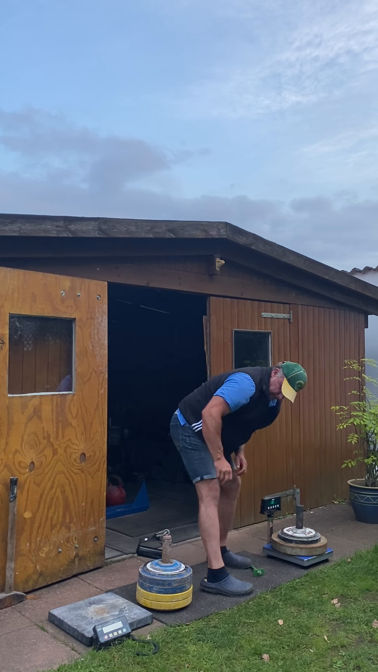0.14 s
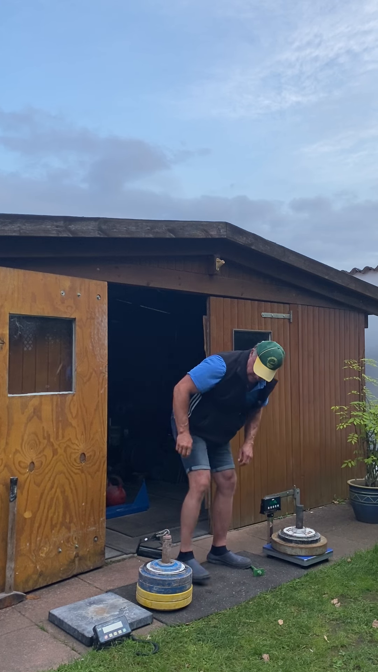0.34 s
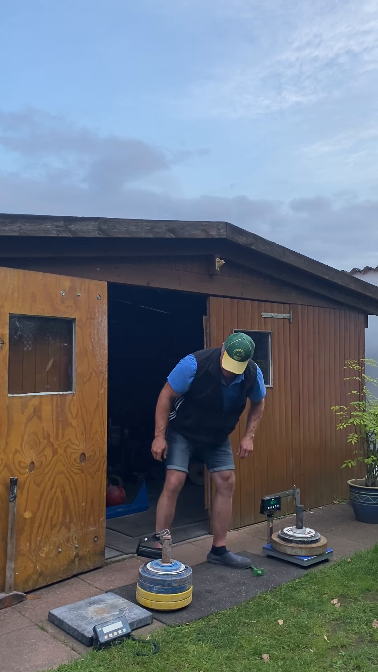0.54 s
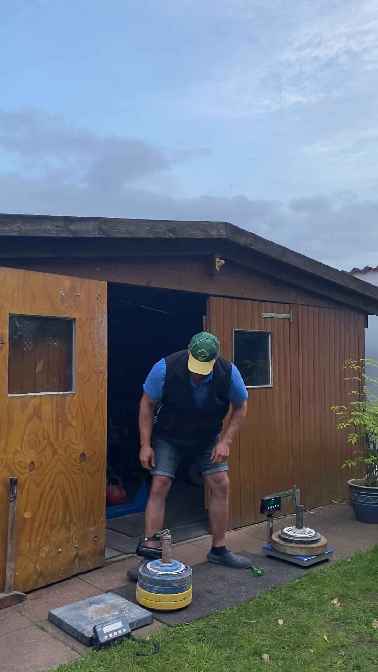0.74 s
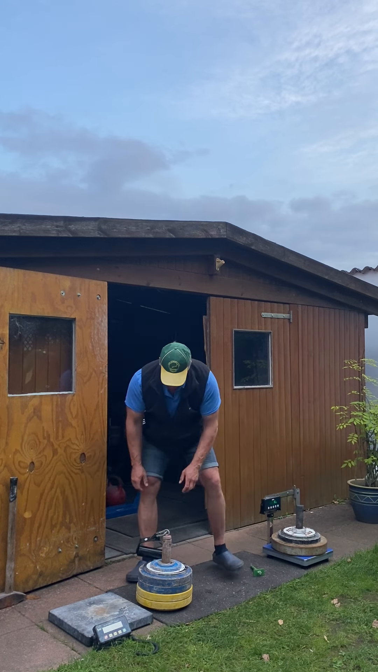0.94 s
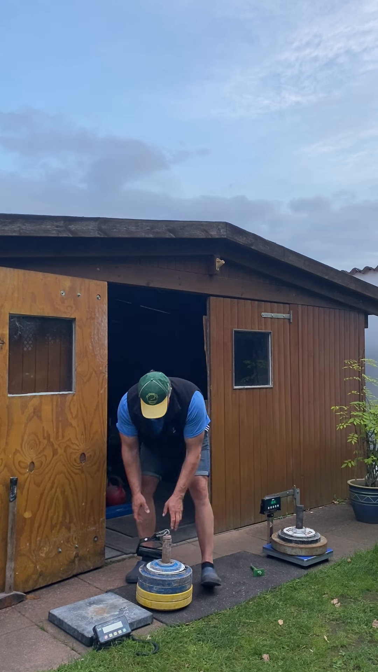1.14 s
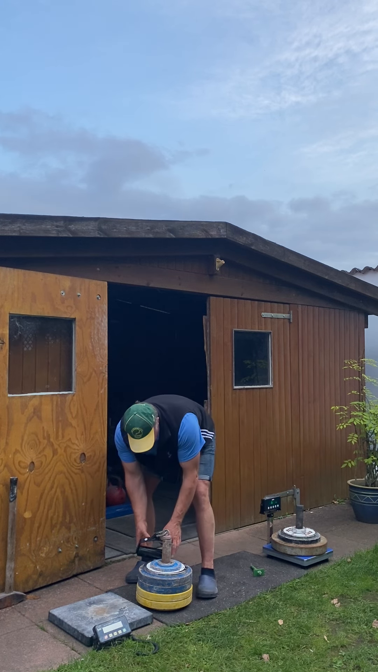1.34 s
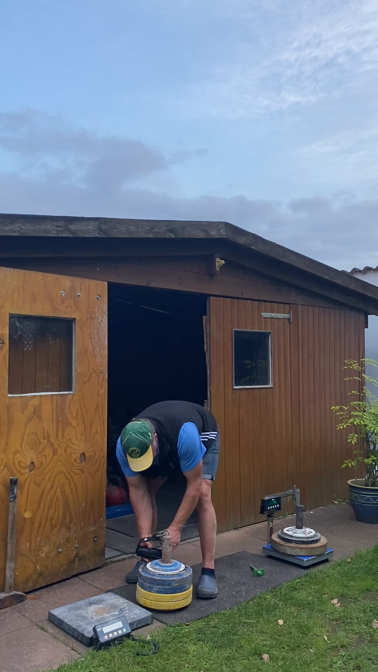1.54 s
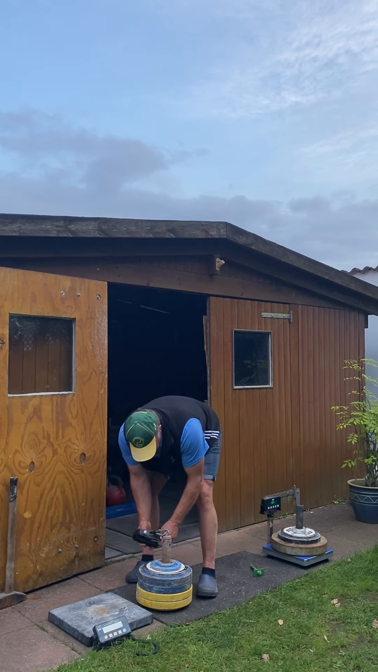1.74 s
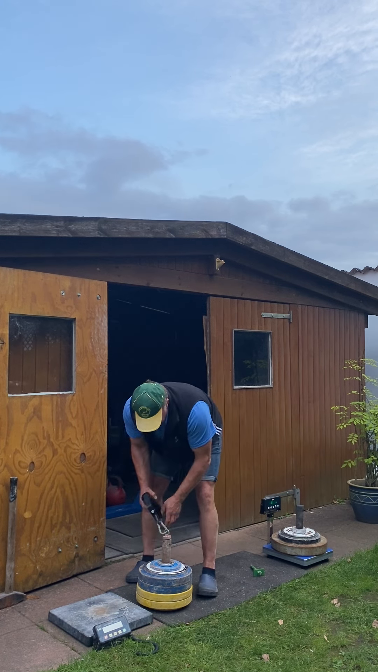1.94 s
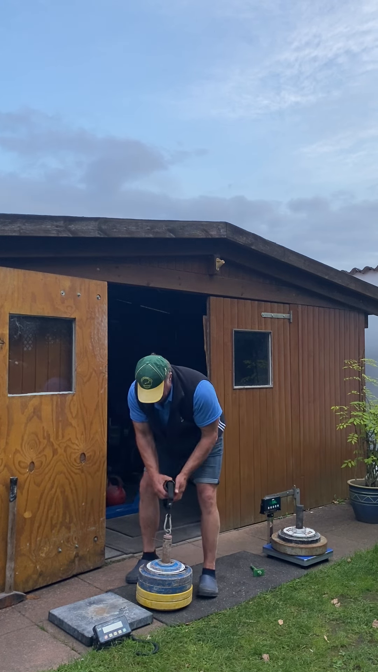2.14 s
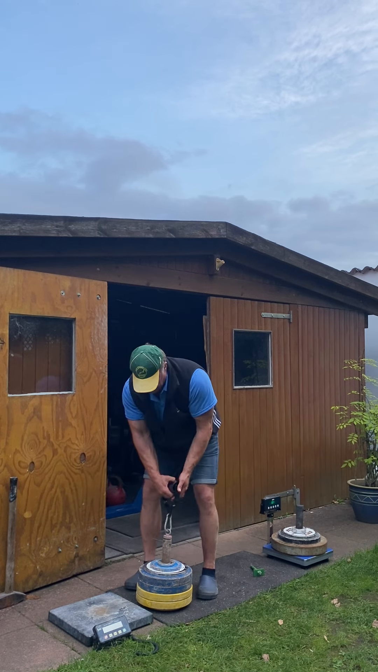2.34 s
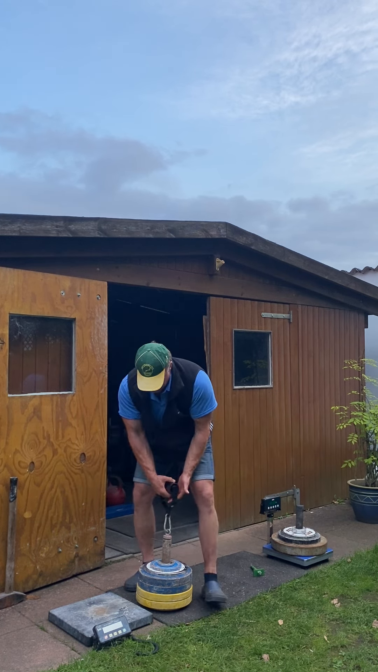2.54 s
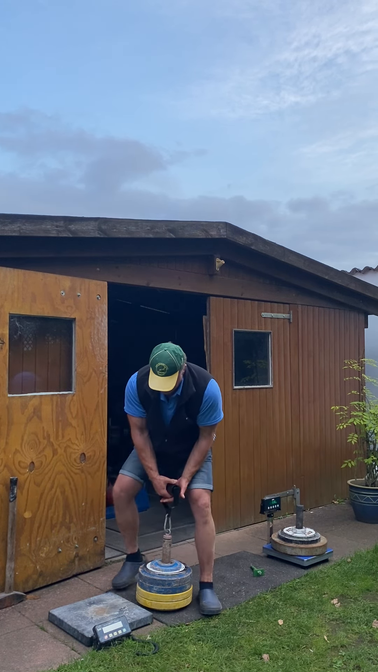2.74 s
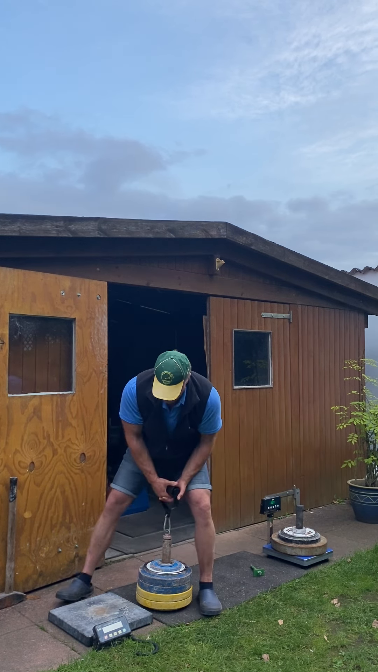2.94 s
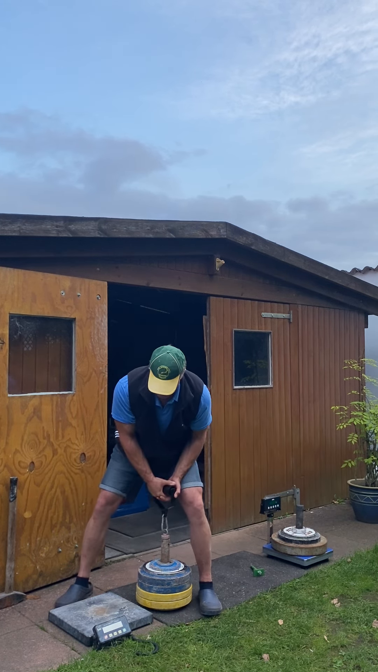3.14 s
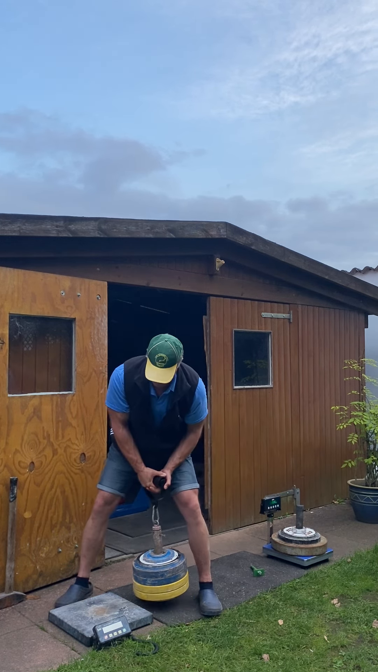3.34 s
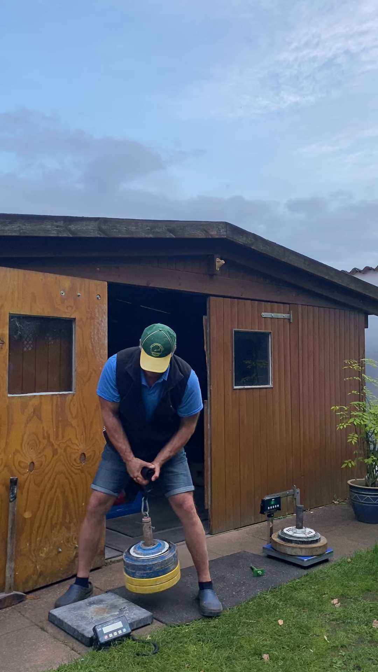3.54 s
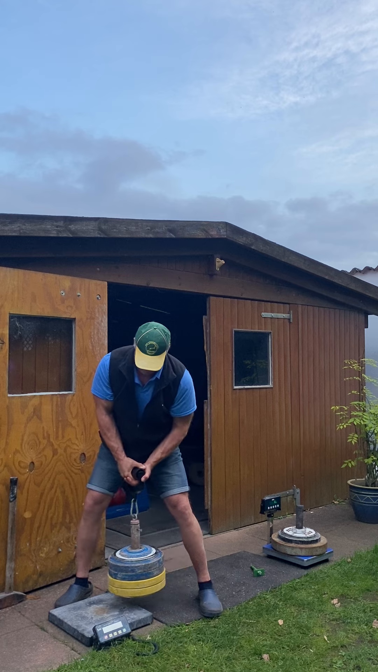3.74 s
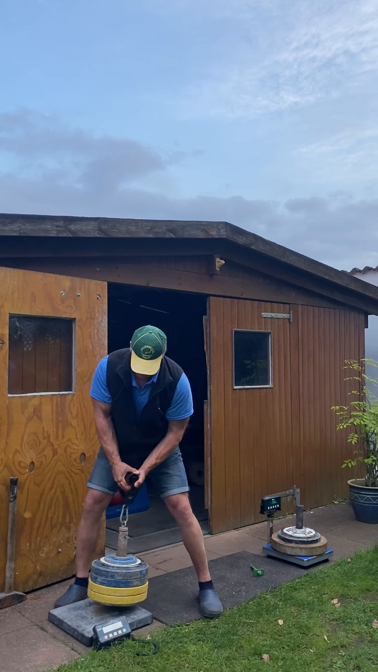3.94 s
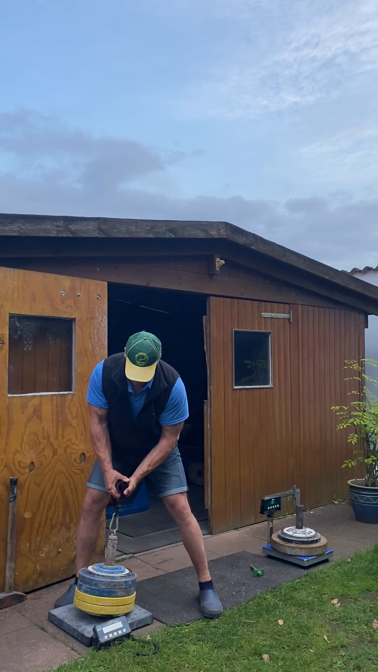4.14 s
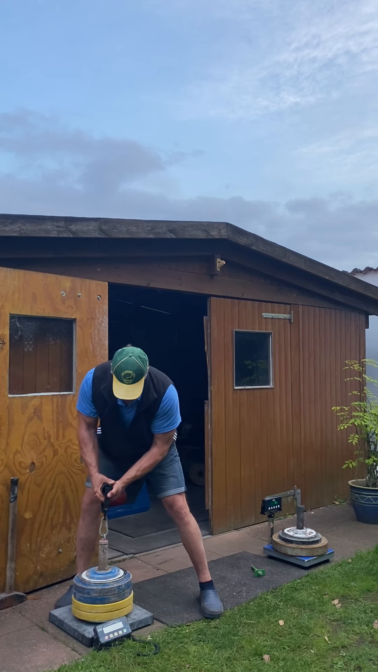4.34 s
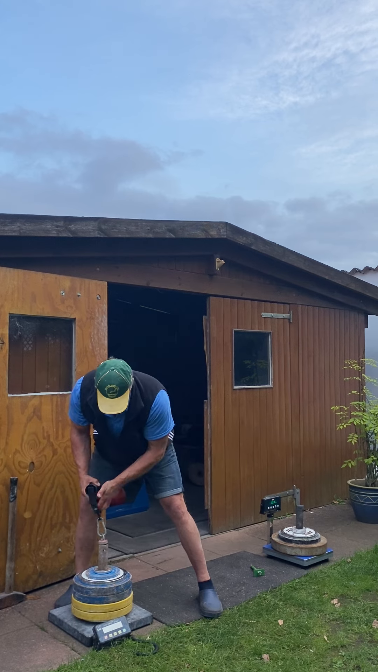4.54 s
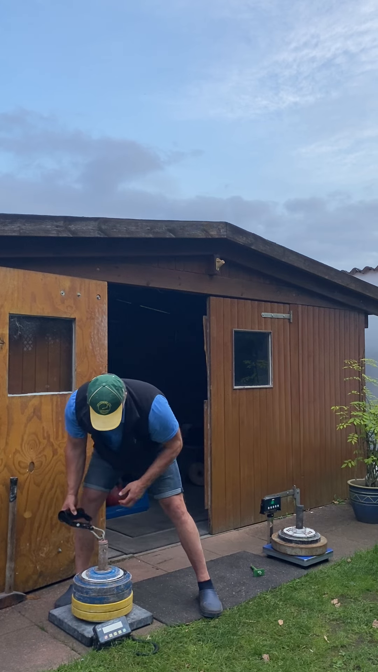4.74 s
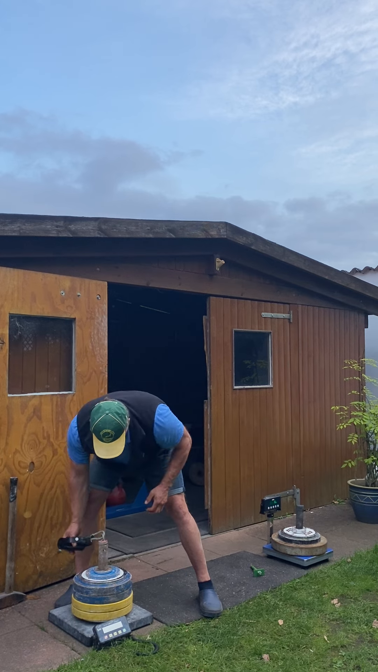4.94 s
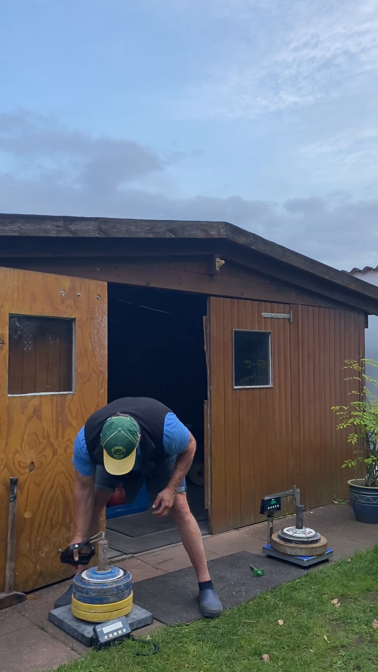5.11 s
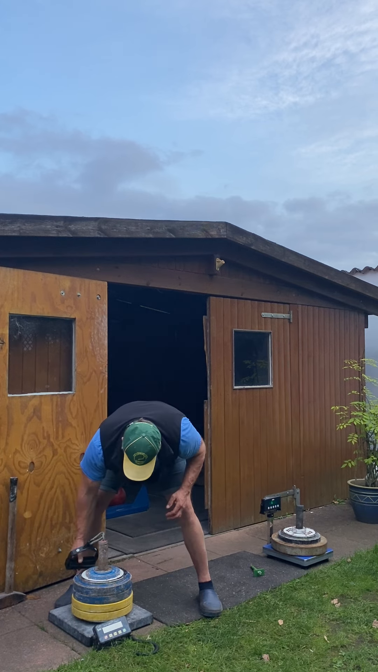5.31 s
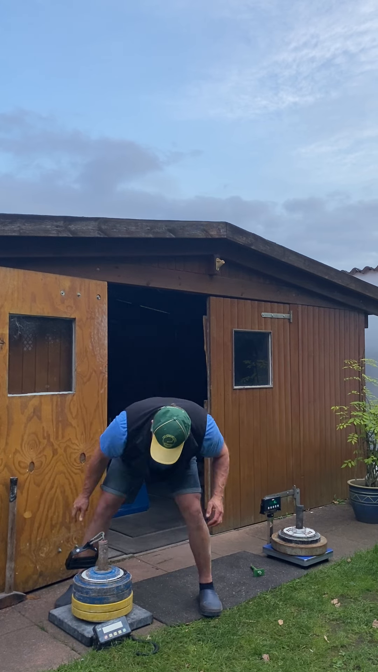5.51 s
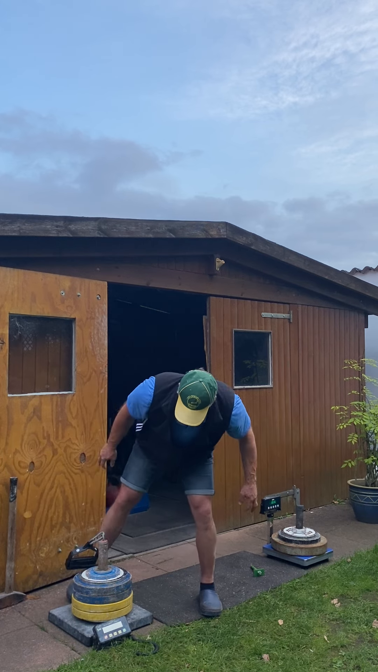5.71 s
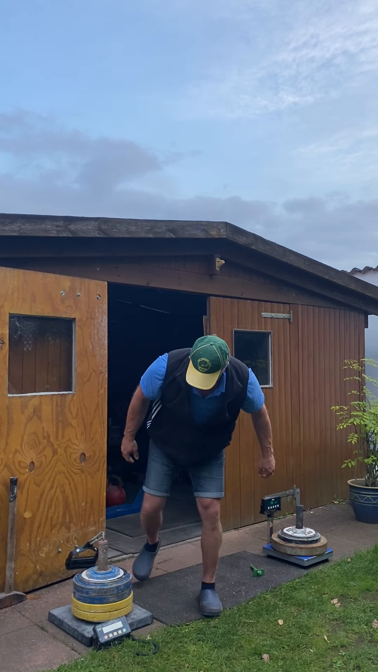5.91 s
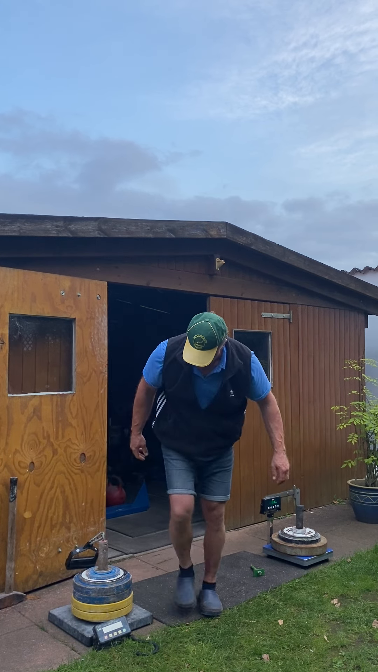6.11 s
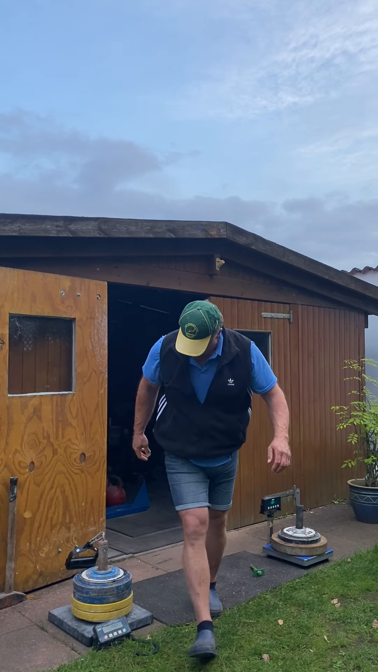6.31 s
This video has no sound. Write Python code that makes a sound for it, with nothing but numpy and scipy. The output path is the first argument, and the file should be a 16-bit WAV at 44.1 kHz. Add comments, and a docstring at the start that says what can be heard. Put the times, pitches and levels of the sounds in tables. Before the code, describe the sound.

Low, soft outdoor air, nearly still at first. Small metal clicks and dull knocks gather as a handle is gripped, with a clear high whistle-like peep and soft footfalls. After a lull with light knocks, heavy plates hit a platform scale twice in quick succession, loud and low with ringing clatter, sliding scrape and another peep. The dropped handle clanks sharply, then one scuff and quiet. Phone stereo, short yard echo.

```python
"""A stack of weight plates lands on a platform scale in two heavy blows: low modes boom, plates ring and rattle.
Before that a hook on a steel handle clinks (gritty contact noise plus damped modes) as it lifts the stack; it
drags now and then before the landing and just before the handle drops against the stack with a clang.
Shoes scuff, tap and bump (shaped noise), thin peeps whistle (gliding sines), and hush is slowly drifting noise.
Place: a yard before a wooden shed, with echo from decaying noise; microphone: the two ports of a phone."""
import sys
import numpy as np
from scipy import signal
from scipy.fft import rfft, irfft, next_fast_len
from scipy.io import wavfile
from scipy.ndimage import uniform_filter1d

SR = 44100
rng = np.random.default_rng(int(sys.argv[2]) if len(sys.argv) > 2 else 0)


def wav_out(sig):
    """Save sig, one row per channel (or a flat mono array), as 16-bit PCM at SR to the path in sys.argv[1]."""
    wavfile.write(sys.argv[1], SR, np.round(np.clip(np.atleast_2d(sig).T, -1, 1) * 32767).astype(np.int16))


N = 280917
TIME = np.arange(N) / SR  # s, whole scene
AGE = np.arange(SR) / SR  # s, since one event began

# Event levels are relative, before echo and ports; mode t60 is before any damping by contact.
# the stack hitting or jolting the scale platform: start_s, level_db
THUDS = [(4.1837, -12), (4.212, -21), (4.2881, -6.5), (4.312, -27.5), (4.35, -19), (4.372, -22.5),
         (4.48, -39), (4.523, -44.5), (4.672, -40), (4.732, -49), (5.198, -29), (5.232, -40)]
# modes of the platform: pitch_hz, level_db, t60_s
SCALE_MODES = [(49, -26.5, 0.3), (164, -12, 0.16), (211.4, -7.5, 0.17), (274.8, 3.5, 0.051),
               (319, 7, 0.029), (369, 0.5, 0.055), (261.3, -16.5, 0.3), (459, -16.5, 0.19)]
# plate striking plate: start_s, level_db, bass_db, treble_db, chatter_s, strongest_hz
CLASHES = [(4.18, -13, 5.5, -2, .014, 716.6), (4.22, -18, -10.5, 5.5, .018, 2046),
           (4.2255, -20, -5.5, 15, .007, 719), (4.237, -26, -8, -2.5, .007, 1154),
           (4.265, -25, -5.5, 1, .006, 760), (4.2855, -11.5, -4, -28, .005, 810),
           (4.303, -13.5, -1.5, 9, .009, 1050), (4.339, -21, -5, 1, .009, 900),
           (4.355, -20.5, -5, 3.5, .007, 1191), (4.372, -35.5, -5.5, 10.5, .012, 1250),
           (4.412, -29.5, -2.5, 4.5, .01, 783.5), (4.455, -34.5, -7.5, 0, .006, 1444),
           (4.476, -35, -8, 0, .006, 2800), (4.507, -29.5, -9.5, -8.5, .004, 1748),
           (4.54, -35.5, -11.5, -6.5, .006, 2300), (4.572, -39.5, -10, -11, .005, 1250),
           (4.619, -41.5, -9.5, -8.5, .006, 1300), (4.685, -38, -0.5, -21, .006, 1030),
           (4.73, -42.5, -0.5, -15.5, .009, 1030), (4.788, -46, 0.5, -15, .012, 1263),
           (4.878, -52, 1, -15.5, .006, 940), (5.042, -49, -6.5, -4, .012, 1200),
           (5.06, -52, -5.5, -2, .007, 1250)]
# colour of plate contact: pitch_hz, level_db
PLATE_COLOUR = [(40, -13), (120, -15), (250, -1), (500, -0.5), (750, 8.5), (1300, 0), (2100, -6.5),
                (3000, -7.5), (4600, -16.5), (5700, -7.5), (8000, -27), (11000, -12), (12500, -10.5)]
# modes of the plates: pitch_hz, level_db, t60_s
PLATE_MODES = [(671, 0, .16), (721, 0, .14), (778, -3, .16), (812, 1, .18), (865, -3, .18), (957, -4, .16),
               (1028, -6, .25), (1128, -5, .2), (1262, -4, .27), (1384, -6, .2), (1575, -6, .2),
               (1712, -7, .22), (1940, -12, .14), (2112, -13, .13), (2299, -14, .13), (2778, -18, .12)]
CLASH_RING_DB = -7
# jolts that set the plates rocking: start_s, body_level_db, treble_level_db, hold_s
ROCKINGS = [(4.181, -25, -27, 0.085), (4.286, -27.5, -29, 0.1)]
ROCK_ATTACK_S, ROCK_T60_S, ROCK_TREBLE_T60_S = 0.0089, 0.21, 0.44
SETTLE_DB, SETTLE_T60_S = -21, 2.1  # a faint wobble outlasts the rocking
ROCK_CLICKS_PER_S, ROCK_CLICK_DB = 160, -8.5  # hard edge contacts amid the grit of the rocking
# plate sliding on plate as the stack twists: start_s, level_db, hold_s
SLIDES = [(4.366, -37, .09), (4.483, -41.5, .025), (4.59, -56, .04)]
# resonances of the sliding plates: pitch_hz, level_db, t60_s
GRIND_MODES = [(853, -5, .07), (1028, -4, 0.11), (1290, -2.5, .14), (1440, -7, 0.07), (1600, -2.5, .1),
               (1665, -1, 0.14), (1735, -0.5, .12), (2130, -8.5, .05), (2280, -9, .08), (2430, -8, .07),
               (2790, -10, .06), (3060, -14, .07), (3550, -16, .06), (3850, -14, .09), (5500, -16, .04)]
SLIDE_ATTACK_S, SLIDE_T60_S = 0.015, 0.71
CATCHES_PER_S, SLIP_DB, GRIND_SWAY_DB = 130, -8, 3.5
# the platform shuddering under the settling stack: pitch_hz, level_db, t60_s
SHUDDER_MODES = [(283, -1, .1), (335, -2, .07), (425, -2, .07)]
SHUDDER_S, SHUDDER_DB, SHUDDER_HOLD_S = 4.62, -52, 0.29

# the handle falling against the stack: start_s, level_db, bass_db, treble_db, chatter_s, strongest_hz
CLANGS = [(5.173, -36, 0.5, 1.5, 0.037, 7200), (5.191, -14.5, -6.5, 1.5, 0.0027, 1250),
          (5.196, -10, -1, 1.5, 0.003, 5840), (5.2029, -20.5, 0, -2, .006, 5800)]
# colour of handle contact: pitch_hz, level_db
HANDLE_COLOUR = [(60, -22.5), (150, -7), (260, 6.5), (400, -1), (600, -3.5), (1200, 3), (1700, 1),
                 (2500, -7.5), (4000, -1), (4950, -17), (5600, -5.5), (6700, -5), (9000, -5), (10600, 7.5),
                 (11400, -21)]
# modes of the handle: pitch_hz, level_db, t60_s
HANDLE_MODES = [(1085, -10, .055), (1188, -5.5, .04), (1255, -8, .04), (1440, -7, .055), (2050, -13, .07),
                (2390, -13, .11), (3397, -21, .13), (2700, -15, .11), (1685, -17, .2), (2982, -18, .33),
                (3763, -20, .12), (5412, -8, .27), (5522, 4, .08), (5620, -2, .04), (5730, -4, .04),
                (5820, -6, .04), (5918, -15, .24), (6368, -19, .33), (7100, -10, .08), (7180, -10, .3),
                (7312, -7, .14), (7540, -14, .26), (8258, -14, .16), (9625, -12, .11), (10045, -7, .18),
                (10845, 0, .1)]
CLANG_RING_DB = -5.5

# the hook clicking against the handle and the eye of the pin: start_s, level_db, treble_db, strongest_hz
CLINKS = [(1.549, -59.5, -6.5, 1793), (1.655, -46, 7.5, 1890), (1.799, -52.5, -6, 3630),
          (1.917, -37.5, 8.5, 1901), (2.0615, -48, 12.5, 2390), (3.722, -66.5, -15, 1900),
          (3.997, -59, -9, 1900), (4.82, -51.5, -11, 2150), (4.899, -48, -5.5, 2100), (5.14, -51, 6, 1400),
          (5.542, -57.5, -0.5, 5600)]
CLINK_BASS_DB, CLINK_CHATTER_S, CLINK_RING_DB = -4, 0.0024, -6.5
# the pin knocking in the plates as it is tugged and swings: start_s, level_db, chatter_s, strongest_hz
KNOCKS = [(1.765, -55, 0.0057, 1316), (1.83, -46.5, 0.003, 795), (1.906, -51, .006, 1000),
          (1.939, -44, 0.0074, 1342), (1.965, -50.5, 0.018, 805), (2.118, -45, 0.013, 1014),
          (2.63, -50.5, 0.0082, 890), (3.252, -57, 0.0037, 980), (3.578, -47, 0.0065, 998),
          (3.595, -49, 0.0033, 1752), (3.619, -46.5, 0.0062, 1100), (3.856, -43.5, .006, 800),
          (3.92, -44.5, 0.013, 997), (4.085, -47, 0.0056, 1334), (4.123, -45, 0.0065, 790.5)]
KNOCK_TREBLE_DB, KNOCK_RING_DB = -15, -3.5
# once the pin bears the weight (s), its knocks carry more bass (dB)
LOADED_S, SLACK_BASS_DB, LOADED_BASS_DB = 3.3, -1.5, 11
# the loaded hook ticks while the stack hangs; jitter and level spread are standard deviations
HANGING_S, TICK_JITTER_S = (3.15, 3.8), 0.04
TICK_DB, TICK_SPREAD_DB, TICK_TREBLE_DB, TICK_CHATTER_S, TICK_HZ = -67, 5, -5.5, 0.0034, 2120
# the hook dragging along steel: start_s, level_db, length_s, treble_db, strongest_hz
DRAGS = [(1.84, -60, 0.087, -3.5, 1078), (1.97, -50.5, 0.15, -15, 780), (2.01, -46.5, .045, -16.5, 1350),
         (3.97, -60.5, .11, -24.5, 900), (4.125, -49.5, 0.1, -22, 780), (4.905, -50.5, 0.05, 8.5, 3750),
         (5.135, -47, 0.04, 5, 1400)]
# colour of hook contact: pitch_hz, level_db
HOOK_COLOUR = [(60, -22), (200, -2.5), (500, -4.5), (780, 10), (1100, -5.5), (1800, -1.5), (2700, -11.5),
               (3700, -9.5), (4800, -19), (7000, -16), (10300, -16), (11500, -35)]
# modes of the hook: pitch_hz, level_db, t60_s
HOOK_MODES = [(781, 1, .13), (850, -5, .07), (1090, -4, .08), (1360, -3, .1), (1750, -4, .07),
              (2000, -6, .06), (2480, -10, .07), (2720, -13, .07), (3490, -9.5, .16), (3660, -10.5, .15),
              (3950, -16, .11), (2250, -9, .08), (3850, -14, .1), (4250, -17, .1), (4500, -19, .1),
              (5450, -16, .14), (5750, -17, .1), (6400, -19, .12), (7300, -15, .15)]

# lift of the resonances that a contact favours, its width as a frequency ratio, and the modes' level spread
SPOT_DB, SPOT_WIDTH, SPOT_SPREAD_DB = 8.5, 1.3, 3.5
# parts that stay in touch lose part of their ring at once: share that lasts, time constant in s
LASTING_SHARE, DAMPING_S = 0.55, 0.015

# soles sliding on the paving: start_s, level_db, length_s, treble_db
SCUFFS = [(0.106, -66, 0.13, -13), (0.602, -63.5, 0.073, -5), (0.752, -59.5, 0.12, -14),
          (2.081, -59.5, 0.15, -4), (2.566, -60.5, 0.23, -18), (2.696, -59, 0.18, -16),
          (2.874, -57, 0.2, -16.5), (5.623, -52, 0.14, -2), (6.321, -62.5, 0.096, -6)]
# colour of the soles: pitch_hz, level_db
SOLE_COLOUR = [(100, -21.5), (400, 1.5), (900, -5.5), (2000, -10), (3500, -13.5), (6500, -9), (10000, -8),
               (12500, -8)]
# heels tapping down as the stance is set: start_s, level_db, treble_db
HEELS = [(2.284, -46, -11), (2.454, -50, -13), (2.576, -51.5, -11), (2.737, -47.5, 1), (2.904, -49, 5.5)]
# colour of the heels: pitch_hz, level_db
HEEL_COLOUR = [(60, -3.5), (200, 11), (450, 0.5), (800, 2), (1800, -3.5), (3000, -13.5), (10000, -15.5)]
HEEL_RISE_S, HEEL_T60_S = 0.0011, 0.086
# dull footfalls and shifting weight: start_s, level_db, length_s
FOOTFALLS = [(1.165, -56.5, 0.05), (1.818, -51.5, 0.53), (2.084, -55, 0.2), (2.28, -46.5, 0.093),
             (2.439, -55.5, 0.11), (2.57, -52.5, 0.21), (2.903, -59, 0.11), (4.045, -52, 0.042),
             (4.445, -47.5, 0.28), (4.787, -58.5, 0.38), (5.204, -53, 0.19), (5.949, -63, 0.23)]
# colour of the footfalls: pitch_hz, level_db
FOOT_COLOUR = [(25, -9), (52, 8), (100, 2.5), (210, -7.5), (350, -11), (700, -30.5), (2000, -60)]
# thin peeps: start_s, level_db, length_s, start_hz, end_hz (pitches before the waver)
PEEPS = [(.8, -72.5, 0.07, 4430, 4330), (2.159, -25.5, 0.08, 8540, 8625), (2.244, -38.5, 0.045, 8620, 8640),
         (2.252, -56.5, 0.035, 2290, 2340), (3.09, -83.5, 0.2, 4570, 4420), (4.593, -22, 0.038, 7990, 7930),
         (4.611, -30, 0.046, 7960, 7960)]

# colour of the outdoor hush: pitch_hz, level_db
HUSH = [(15, -37), (25, -13.5), (53, 1), (80, 0.5), (208, -11.5), (488, -12.5), (584, -14), (1730, -23),
        (3210, -30.5), (4270, -32), (4730, -39), (5820, -36.5), (9760, -42), (12000, -50), (15600, -87),
        (22000, -120)]
# level of the hush above 600 Hz: time_s, level_db
HUSH_TREBLE = [(0, 0), (1, 0), (2.9, 0.5), (3.5, -4), (4.1, -5), (5.5, 2), (6.1, -3.5)]
HUSH_DRIFT_DB, HUSH_DRIFT_PER_S = 1.3, 7
# the yard's echo: pitch_hz, t60_s
YARD_T60 = [(150, 0.22), (500, 0.56), (1500, 0.18), (4000, 0.36), (10000, 0.22)]
# phase of the left port against the right: pitch_hz, phase_rad
PORT_PHASE = [(0, 0), (100, -.1), (220, -.7), (340, -1.4), (600, -3.1), (1210, -5.5), (2000, -6.1),
              (3000, -4.9), (3530, -5.5), (4300, -4.9), (5100, -6.3), (5600, -5.7), (7500, -4.8),
              (11000, -3.9), (12100, -3.2)]
# level of the left port against the right: pitch_hz, level_db
PORT_BALANCE = [(60, -.3), (110, -.5), (190, -3.5), (350, -7.5), (630, -10), (1130, -5), (2040, -2.5),
                (3670, -3), (6600, .7), (11900, 0)]
TOP_HZ = 12200


def scale(push_s=0.0021):
    """The heavy stack pushes the platform, which booms in a few low modes."""
    boom = crest(ringing(SCALE_MODES) * (1 - np.exp(-(AGE / push_s) ** 2)))
    # the boom is strong near 50 Hz and from 160 Hz up, weak around 90 Hz
    boom = crest(tint(boom, [(50, 8), (90, -10), (160, 3)]))
    out = np.zeros(N)
    for s, db in THUDS:
        add(out, s, undb(db) * boom)
    return out


def plates():
    """Plates strike each other: chattering contact noise and ringing plate modes."""
    rows = [(*row, CLASH_RING_DB) for row in CLASHES]
    return blows(rows, PLATE_COLOUR, PLATE_MODES, rise_s=0.0016, tail_db=-23, tail_t60=0.2,
                 buzz=0.2, spread_db=SPOT_SPREAD_DB)


def rattle(ring_db=-2):
    """Loose plates rock on each other: lumpy contacts and their ring, under a treble that fades more slowly."""
    body_gain, treble_gain = np.zeros(N), np.zeros(N)
    for s, body_db, treble_db, hold_s in ROCKINGS:
        rocking = stir(s, ROCK_ATTACK_S, hold_s, ROCK_T60_S)
        settling = undb(SETTLE_DB) * stir(s, ROCK_ATTACK_S, hold_s, SETTLE_T60_S)
        body_gain += undb(body_db) * (rocking + settling)
        treble_gain += undb(treble_db) * stir(s, ROCK_ATTACK_S, hold_s, ROCK_TREBLE_T60_S)
    contacts = grit(N, 4.5) + undb(ROCK_CLICK_DB) * clatter(ROCK_CLICKS_PER_S)
    body = tint(contacts, [(40, -14), (150, -13), (300, 2), (550, -11), (780, 8), (1100, 4),
                           (1800, 2.5), (2800, -3.5), (4200, -7.5), (7000, -21)])
    ring = ringing(PLATE_MODES) * fade(0.14)  # plates in touch damp each other
    body = unit(body) + undb(ring_db) * unit(signal.fftconvolve(contacts, ring)[:N])
    treble = tint(contacts, [(2000, -33), (4000, -0.5), (4900, 0), (5550, 6.5), (6500, 1),
                             (8000, -2), (11000, -5), (12500, -13)])
    lumps = undb(3 * wander(N, 70))
    return body * body_gain * lumps + unit(treble) * treble_gain


def grind():
    """Plate slides on plate: separate catches keep a few resonances singing, each coming and going."""
    gain = sum(undb(db) * stir(s, SLIDE_ATTACK_S, hold_s, SLIDE_T60_S) for s, db, hold_s in SLIDES)
    slips = clatter(CATCHES_PER_S) + undb(SLIP_DB) * grit(N, 5)
    song = np.zeros(N)
    for mode in GRIND_MODES:
        voice = signal.fftconvolve(slips, ringing([mode]))[:N]
        song += voice * undb(GRIND_SWAY_DB * wander(N, 27))
    return gain * unit(song)


def shudder(attack_s=0.04, t60=0.5):
    """The settling stack keeps the platform humming low: gritty contact drives three modes."""
    hum = unit(signal.fftconvolve(grit(N, 3), ringing(SHUDDER_MODES))[:N])
    return undb(SHUDDER_DB) * hum * stir(SHUDDER_S, attack_s, SHUDDER_HOLD_S, t60)


def handle():
    """The handle drops against the stack: a brief chatter and a bright clang of its modes."""
    rows = [(*row, CLANG_RING_DB) for row in CLANGS]
    return blows(rows, HANDLE_COLOUR, HANDLE_MODES, rise_s=0.0006, tail_db=-23.5, tail_t60=0.17, buzz=0.14)


def hook(count=8):
    """Clicks of the hook, dull knocks of the pin and faint ticks under load, all as steel blows."""
    clicks = [(s, db, CLINK_BASS_DB, treble_db, CLINK_CHATTER_S, hz, CLINK_RING_DB)
              for s, db, treble_db, hz in CLINKS]
    knocks = [(s, db, LOADED_BASS_DB if s > LOADED_S else SLACK_BASS_DB,
               KNOCK_TREBLE_DB, chatter_s, hz, KNOCK_RING_DB)
              for s, db, chatter_s, hz in KNOCKS]
    chances = rng.standard_normal((count, 2))
    ticks = [(s + TICK_JITTER_S * late, TICK_DB + TICK_SPREAD_DB * size, SLACK_BASS_DB,
              TICK_TREBLE_DB, TICK_CHATTER_S, TICK_HZ, CLINK_RING_DB)
             for s, (late, size) in zip(np.linspace(*HANGING_S, count), chances)]
    return blows(clicks + knocks + ticks, HOOK_COLOUR, HOOK_MODES, rise_s=0.003, tail_db=-22,
                 tail_t60=0.1, buzz=0.2, detune=0.028, spread_db=SPOT_SPREAD_DB)


def drags(ring_db=-2):
    """The hook slips in tiny catches that rasp and keep it ringing."""
    out = np.zeros(N)
    for s, db, length_s, treble_db, hz in DRAGS:
        slips = grit(SR, 5) * np.sin(np.pi * np.minimum(AGE / length_s, 1)) ** 0.5
        rasp = crest(tint(slips, HOOK_COLOUR))
        ring = crest(signal.fftconvolve(slips, ringing(HOOK_MODES))[:SR])
        sound = favour(rasp + undb(ring_db) * ring, hz)
        add(out, s, undb(db) * crest(tint(sound, [(2000, 0), (6000, treble_db)])))
    return out


def blows(rows, colour, modes, rise_s, tail_db, tail_t60, buzz, detune=0, spread_db=1):
    """Steel on steel: the faces chatter briefly, a dense noisy tail lingers and separate modes ring."""
    out = np.zeros(N)
    onset = 1 - np.exp(-AGE / rise_s)
    # the parts stay in loose touch, which damps the ring and makes it buzz
    damping = LASTING_SHARE + (1 - LASTING_SHARE) * np.exp(-AGE / DAMPING_S)
    for s, db, bass_db, treble_db, chatter_s, spot_hz, ring_db in rows:
        envelope = np.exp(-AGE / chatter_s) + undb(tail_db) * fade(tail_t60)
        contact = tint(grit(SR, 1.7) * onset * envelope, colour)
        # each blow lands on another spot, which shifts the share and, with detune, the pitch of the modes
        ring = np.zeros(SR)
        for hz, mode_db, t60 in modes:
            share, shift = rng.standard_normal(2)
            cycles = hz * (1 + detune * shift) * AGE + rng.random()
            ring += undb(mode_db + spread_db * share) * fade(t60) * np.sin(2 * np.pi * cycles)
        ring = ring * onset * damping * (1 + buzz * wander(SR, 160))
        sound = favour(crest(contact) + undb(ring_db) * crest(ring), spot_hz)
        sound = tint(sound, [(280, bass_db), (700, 0), (2000, 0), (6000, treble_db)])
        add(out, s, undb(db) * crest(sound))
    return out


def favour(x, hz):
    """The spot of contact brings out the resonances around one frequency."""
    return tint(x, [(hz / SPOT_WIDTH, 0), (hz, SPOT_DB), (hz * SPOT_WIDTH, 0)])


def shoes():
    """Soles slide on stone: gritty noise that swells and sinks."""
    out = np.zeros(N)
    for s, db, length_s, treble_db in SCUFFS:
        n = int(length_s * SR)
        slide = tint(grit(n, 2.1), SOLE_COLOUR) * np.sin(np.pi * np.linspace(0, 1, n) ** 0.75)
        add(out, s, undb(db) * crest(tint(slide, [(2000, 0), (7000, treble_db)])))
    return out


def heels():
    """Short gritty taps of a heel meeting the ground."""
    out = np.zeros(N)
    for s, db, treble_db in HEELS:
        envelope = (1 - np.exp(-AGE / HEEL_RISE_S)) * fade(HEEL_T60_S)
        tap = tint(grit(SR, 2.9) * envelope, HEEL_COLOUR)
        add(out, s, undb(db) * crest(tint(tap, [(2000, 0), (6000, treble_db)])))
    return out


def footfalls():
    """Soft low bumps of weight shifting on the ground: swells of low noise."""
    out = np.zeros(N)
    for s, db, length_s in FOOTFALLS:
        n = int(length_s * SR)
        swell = np.sin(np.pi * np.linspace(0, 1, n) ** 0.5)
        add(out, s, undb(db) * crest(tint(rng.standard_normal(n), FOOT_COLOUR) * swell))
    return out


def peeps(flutter_db=-2.0, droop_db=-7):
    """Almost pure whistles that start with an uneven pitch, then steady and sag in level."""
    out = np.zeros(N)
    for s, db, length_s, start_hz, end_hz in PEEPS:
        n = int(length_s * SR)
        waver = (0.002 + 0.014 * np.exp(-AGE[:n] / 0.018)) * wander(n, 700)
        hz = np.linspace(start_hz, end_hz, n) * (1 + waver)
        edges = signal.windows.tukey(n, min(0.026 / length_s, 1))
        swell = edges * undb(np.linspace(0, droop_db, n) + flutter_db * wander(n, 300))
        add(out, s, undb(db) * swell * np.sin(2 * np.pi * np.cumsum(hz) / SR))
    return out


def hush(count=8):
    """Distant outdoor rumble and air: each noise band drifts alone, and the treble slowly comes and goes."""
    rumble_cut = signal.butter(2, 35, "high", fs=SR, output="sos")
    noise = rfft(signal.sosfilt(rumble_cut, tint(rng.standard_normal(N), HUSH)))
    hz = np.arange(N // 2 + 1) * SR / N
    air = np.zeros(N)
    for band in bands(np.geomspace(60, 6000, count), hz):
        air += irfft(noise * band, N) * undb(HUSH_DRIFT_DB * wander(N, HUSH_DRIFT_PER_S))
    treble = signal.sosfiltfilt(signal.butter(2, 600, "high", fs=SR, output="sos"), air)
    gain = undb(np.interp(TIME, *np.transpose(HUSH_TREBLE)))
    return unit(air + (gain - 1) * treble)


def yard(x):
    """Scattered echoes from shed, fence and paving: noise whose bands die at their own rates."""
    noise = rfft(rng.standard_normal(SR))
    centres, t60s = np.transpose(YARD_T60)
    hz = np.arange(SR // 2 + 1)
    echo = sum(irfft(noise * band) * fade(t60) for band, t60 in zip(bands(centres, hz), t60s))
    echo = echo * (1 - np.exp(-AGE / 0.0029))
    return signal.fftconvolve(x, echo / np.sqrt(np.sum(echo ** 2)))[:N]


def ports(x):
    """The two microphone ports hear one sound with different colour and phase."""
    n = next_fast_len(N + 4096)
    hz, spectrum = np.arange(n // 2 + 1) * SR / n, rfft(x, n)
    balance_db = along(PORT_BALANCE, hz)
    phase = np.interp(hz, *np.transpose(PORT_PHASE))
    left = irfft(spectrum * undb(balance_db / 2) * np.exp(1j * phase), n)
    right = irfft(spectrum * undb(-balance_db / 2), n)
    return np.array([left, right])[:, :N]


def undb(db):
    """Decibels to gain."""
    return 10 ** (np.asarray(db) / 20)


def unit(x):
    """Scale to rms 1."""
    return x / np.sqrt(np.mean(x ** 2))


def crest(x, size=220):
    """Scale so that the loudest few milliseconds have rms 1."""
    return x / np.sqrt(uniform_filter1d(x ** 2, size).max())


def along(points, hz):
    """Read (Hz, value) points on a log-frequency axis."""
    f, value = np.transpose(points)
    return np.interp(np.log(hz + 1), np.log(f + 1), value)


def bands(centres, hz):
    """Overlapping band gains that sum to one at every frequency."""
    return [along(list(zip(centres, share)), hz) for share in np.eye(len(centres))]


def tint(x, points):
    """Causal filter through (Hz, dB) points, made minimum-phase by folding its cepstrum."""
    n = 2 * next_fast_len(len(x))
    cepstrum = irfft(np.log(undb(along(points, np.arange(n // 2 + 1) * SR / n))))
    cepstrum[1:n // 2] *= 2
    cepstrum[n // 2 + 1:] = 0
    return irfft(rfft(x, n) * np.exp(rfft(cepstrum)))[:len(x)]


def fade(t60):
    """Exponential decay by 60 dB in t60 seconds."""
    return np.exp(-np.log(1000) * AGE / t60)


def stir(s, attack_s, hold_s, t60):
    """Envelope of a motion that starts at s, keeps up for a while and dies away."""
    age = TIME - s
    decay = np.exp(-np.log(1000) * np.maximum(age - hold_s, 0) / t60)
    return np.clip(age / attack_s, 0, 1) * decay


def wander(n, rate):
    """Random values joined by straight lines, rate of them a second."""
    place = np.arange(n) * rate / SR
    knots = rng.standard_normal(int(place[-1]) + 2)
    return np.interp(place, np.arange(len(knots)), knots)


def grit(n, spread_db):
    """Dense tiny contacts of uneven size: noise whose level jumps every 32 samples."""
    sizes_db = spread_db * np.repeat(rng.standard_normal(n // 32 + 1), 32)[:n]
    return unit(rng.standard_normal(n) * undb(sizes_db))


def clatter(rate):
    """Lone hard contacts at random moments, on average rate of them a second."""
    hits = rng.random(N) < rate / SR
    return unit(hits * rng.choice([-1, 1], N) * rng.uniform(0.69, 1, N))


def ringing(modes):
    """Response of a set of damped modes to one tap."""
    return sum(undb(db) * fade(t60) * np.sin(2 * np.pi * hz * AGE) for hz, db, t60 in modes)


def add(track, s, sound):
    """Mix a sound in at time s."""
    i = max(int(s * SR), 0)
    track[i:i + len(sound)] += sound[:N - i]


def scene():
    """All sources in the yard, heard through both ports."""
    stack = scale() + plates() + undb(-5) * rattle() + grind() + shudder()
    feet = shoes() + heels() + footfalls()
    direct = stack + handle() + hook() + drags() + feet
    whistles = peeps()
    # the peeps come from further off, so more of them is echo
    near = direct + undb(-11.5) * yard(direct) + whistles + undb(-9.5) * yard(whistles)
    near = near + undb(-63.5) * hush()
    # long waves reach both ports alike, so the diffuse part, drawn afresh for each port, has little bass
    diffuse = np.array([tint(undb(-17.5) * yard(direct) + undb(-69) * hush(),
                             [(60, -16), (200, -6.5), (500, 2)]) for _ in range(2)])
    return ports(near) + diffuse


def record(dry):
    """The phone rounds the tallest peaks and cuts the top."""
    top_cut = signal.ellip(8, 0.2, 70, TOP_HZ, fs=SR, output="sos")
    return signal.sosfilt(top_cut, np.tanh(dry))


dry = scene()
out = record(dry)
wav_out(out)
```